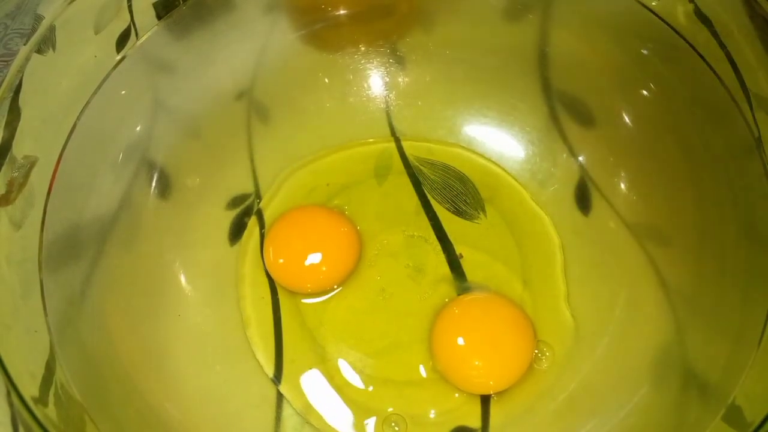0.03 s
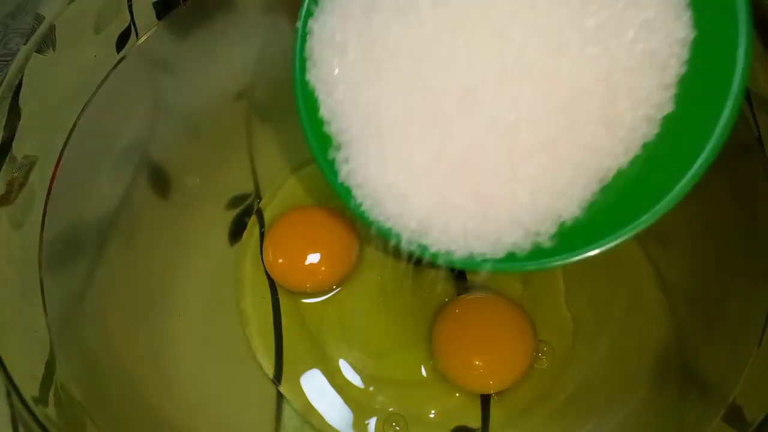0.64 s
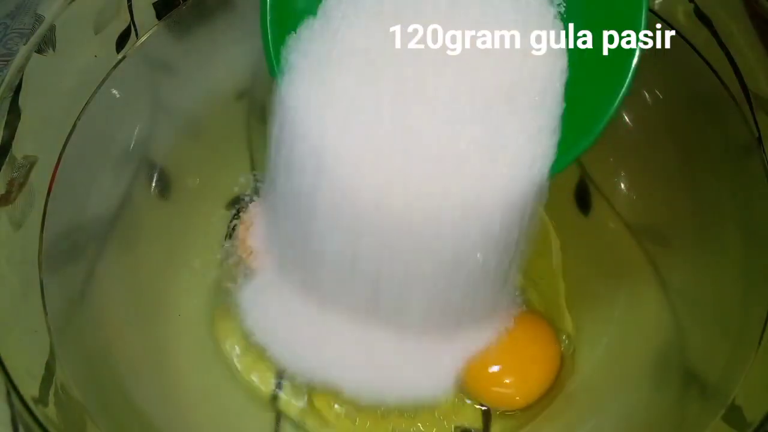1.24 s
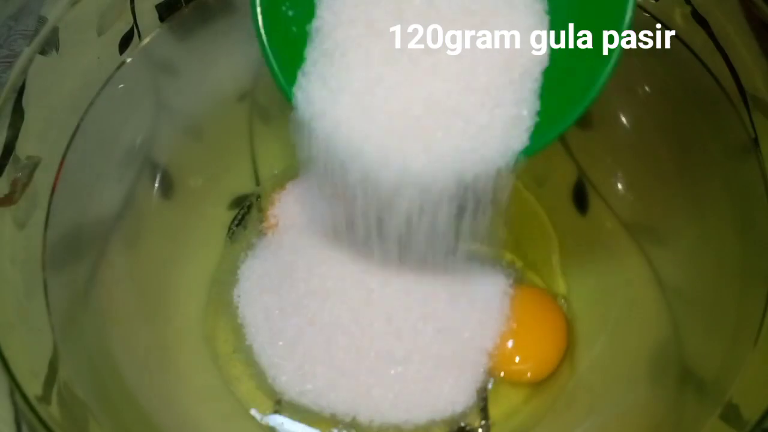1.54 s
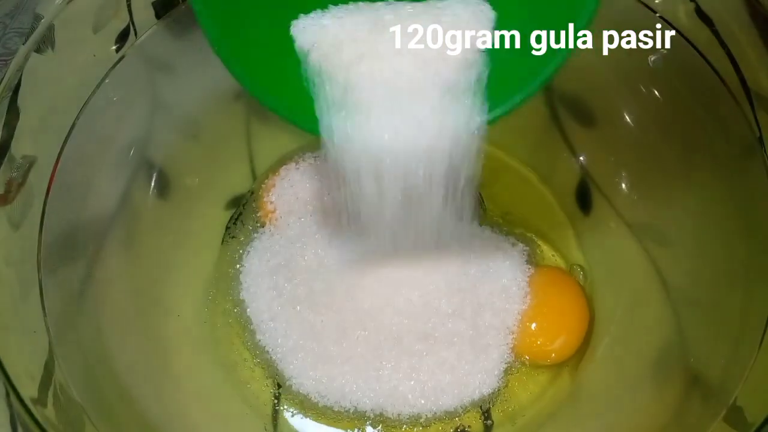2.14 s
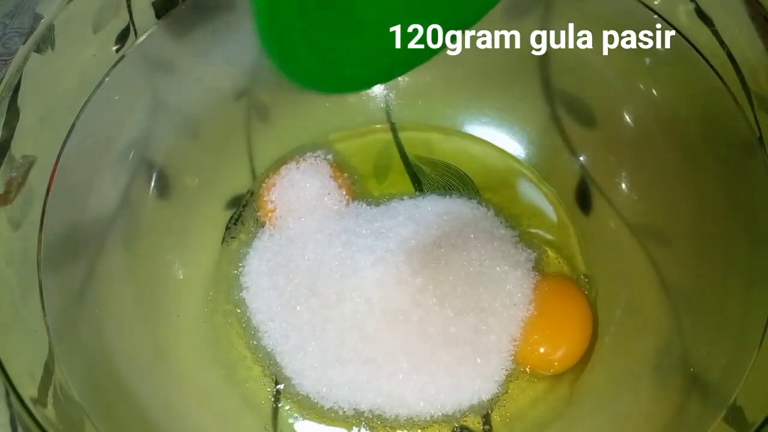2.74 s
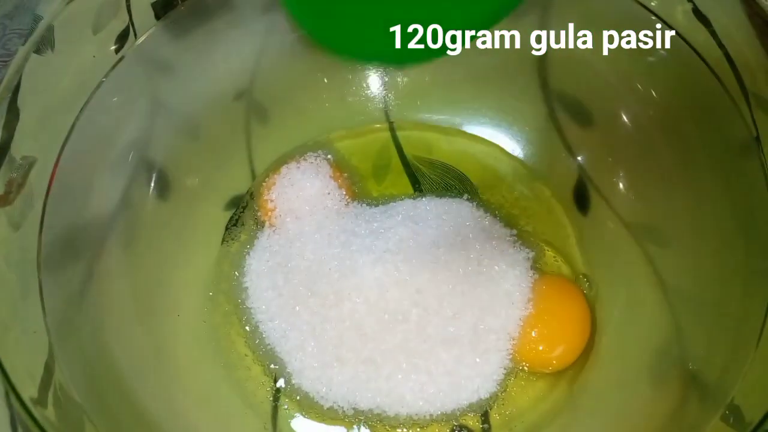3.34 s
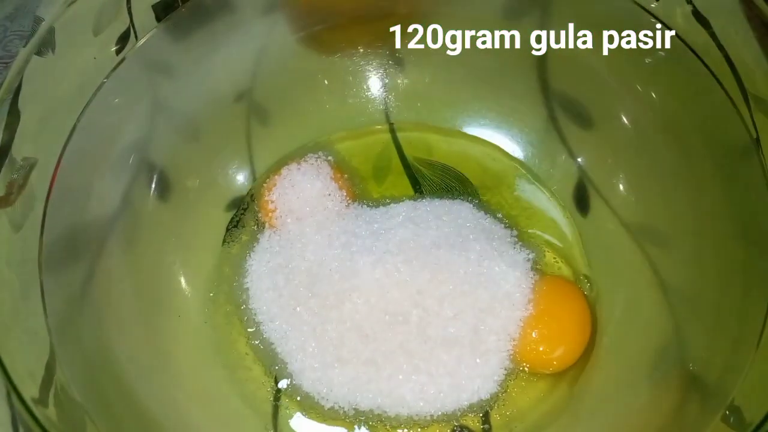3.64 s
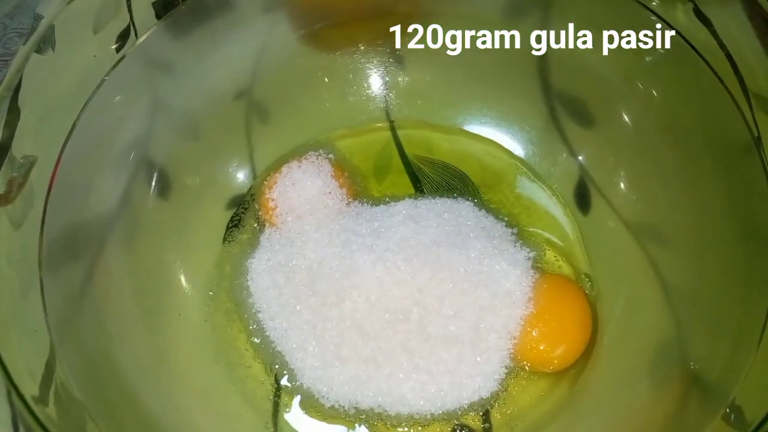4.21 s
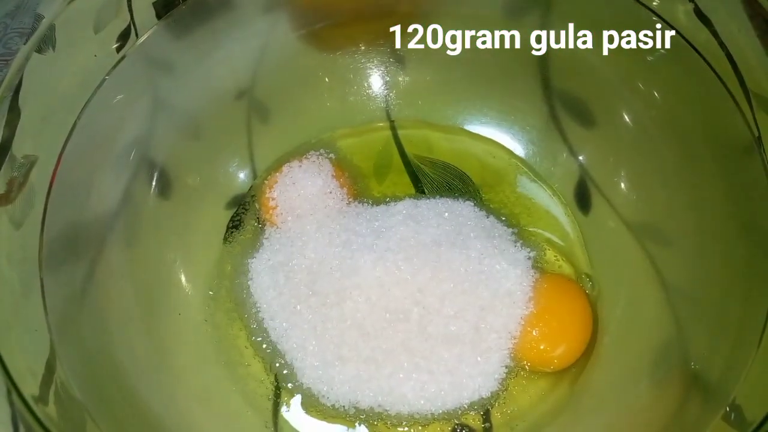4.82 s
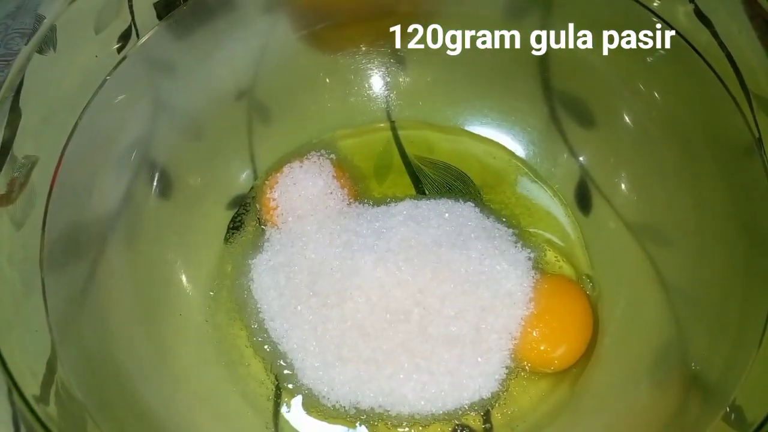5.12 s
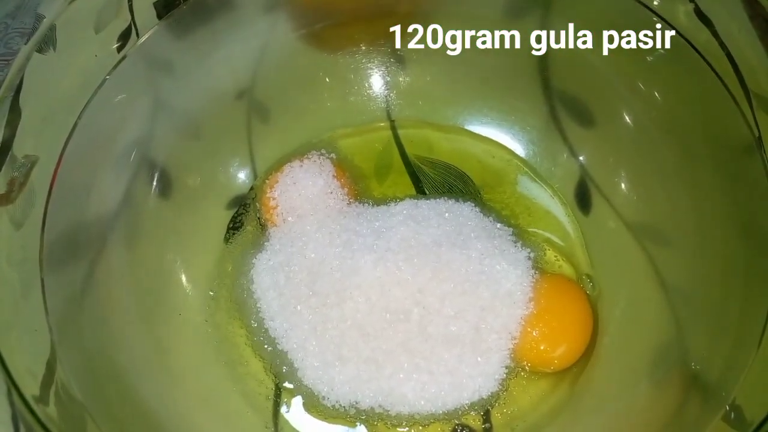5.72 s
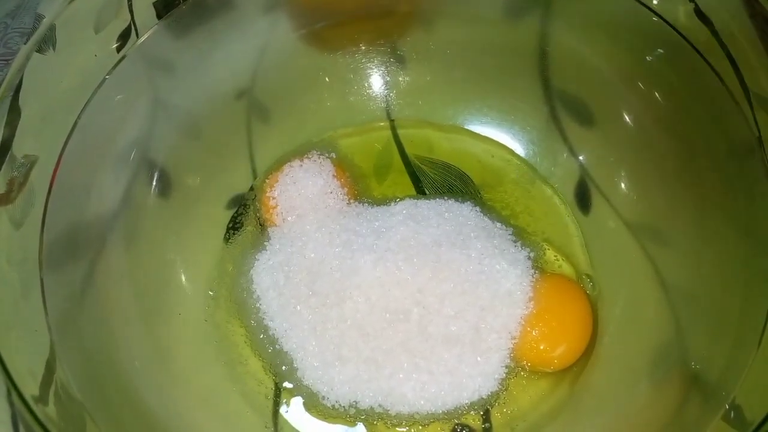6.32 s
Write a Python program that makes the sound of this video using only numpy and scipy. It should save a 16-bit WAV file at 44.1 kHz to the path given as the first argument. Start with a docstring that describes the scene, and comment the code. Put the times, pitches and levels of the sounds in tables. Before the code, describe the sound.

Close by in a small kitchen, over a faint appliance hum, sugar slides from a plastic cup and hisses gently into a glass bowl of eggs for about two seconds. Two loud, quick knocks of the cup against the rim follow, leaving a low ring in the bowl. A second later the cup lands on the worktop and rocks briefly to rest, and only the quiet room remains.

```python
"""A stream of sugar slides out of a plastic cup onto eggs in a glass mixing bowl.
Its countless small impacts merge into a hiss and a patter coloured by the resonances of the bowl.
Two knocks on the rim, to empty the cup, excite the modes of plastic and glass; the cup is then
set down on the worktop and rocks to rest. A small kitchen reverberates over an appliance's hum."""
import sys
import numpy as np
from scipy import signal
from scipy.io import wavfile

SR = 44100
rng = np.random.default_rng(int(sys.argv[2]) if len(sys.argv) > 2 else 0)


def inscribe(sig):
    """Save sig as 16-bit PCM at rate SR to the path in sys.argv[1].

    A 1-D sig is mono; a 2-D sig holds one channel per row.
    Samples are clipped to [-1, 1] before scaling.
    """
    pcm = np.round(np.clip(np.atleast_2d(sig).T, -1, 1) * 32767)
    wavfile.write(sys.argv[1], SR, pcm.astype(np.int16))


N = 280917
TIME = np.arange(N) / SR


def sugar_stream(fall_s=.02, full_flow_db=-47.5, patter_db=-50.5, flow_exponent=.88):
    """Superposed random impacts: sugar patters on wet egg and hisses on its own heap."""
    # flow of the falling stream (t/s, level/dB)
    flow_curve = [(0.8, -67), (1.06, -47.5), (1.216, -48.5), (1.306, -46), (1.436, -57.5), (1.636, -57.5),
                  (1.802, -51.5), (2.108, -56.5), (2.368, -52), (2.434, -59), (2.6, -79.5)]
    # spectra of impacts on sugar and on egg (f/Hz, level/dB)
    hiss_spectrum = [(1760, -23.5), (3000, -7.5), (3560, -9), (3820, -21.5), (4140, -3.5), (4790, -7),
                     (6660, -1), (7430, -2.5), (8070, -10), (9780, -5.5), (11600, -4), (12900, -2.5),
                     (15500, -7)]
    patter_spectrum = [(300, -7), (700, -16), (1450, -15.5), (1800, -4), (2250, -8.5), (3000, -4),
                       (3600, -5), (4700, -13), (6000, -6), (8000, -23.5)]
    # resonances of the bowl (f/Hz, width/Hz, gain/dB)
    bowl_peaks = [(1061, 166, 16), (1936, 16, 9.5), (2590, 170, 7)]
    flow = envelope(flow_curve) * wander(spread_db=.4, every_s=.02)
    arriving = np.interp(TIME - fall_s, TIME, flow) / gain_of(full_flow_db)
    covered_db = -5.5 * smooth_step(TIME, middle_s=1.62, length_s=.5)  # the heap buries the eggs
    on_egg = arriving ** flow_exponent * gain_of(patter_db + covered_db)
    hiss = shaped(grains(per_s=22000, spread_db=-1.4) * flow, hiss_spectrum)
    patter = shaped(grains(per_s=5000, spread_db=.2) * on_egg, patter_spectrum, bowl_peaks)
    return hiss + patter


def sugar_in_cup(start_s=.335, tilted_s=.5, light_s=1):
    """Stick-slip friction: crystals scrape the cup, whose resonances shift as it tilts and empties."""
    # the heap slides, then the last sugar runs out (peak t/s, level/dB, rise and fall/(dB/s))
    heap_slide = (0.61, -51.5, 44, 76)
    run_out = (2.41, -54, 49, 130)
    # clumps break loose as the cup tilts and after the first knock (t/s, level/dB)
    clumps = [(.339, -55), (.390, -61), (.405, -50), (0.427, -50), (0.472, -49), (0.512, -43),
              (0.541, -39.5), (.714, -70), (3.043, -48), (3.112, -44), (3.126, -44)]
    # spectrum of the scraping (f/Hz, level/dB)
    grit = [(500, -28.5), (2200, -11), (3300, -9), (5000, -4.5), (7300, -2.5), (8300, -4.5), (10500, -4.5),
            (13000, 1), (15500, -3)]
    # resonances of the cup at each stage (f/Hz, width/Hz, gain/dB)
    cup_full = [(3700, 130, 13), (4320, 160, 16), (5230, 200, 7), (5880, 220, 11), (11900, 300, 4)]
    cup_tilted = [(3000, 350, 7), (3650, 220, 9), (4350, 200, 5), (5220, 290, 11), (5900, 260, 10.5),
                  (11200, 250, 4), (13100, 400, 4)]
    cup_empty = [(2692, 380, 6.9), (3687, 630, 14.7), (4320, 280, 13.5), (5895, 300, 2.6), (6970, 450, 9.8)]
    slips = np.zeros(N)
    for s, db in clumps:
        add(slips, s, gain_of(db) * np.exp(-TIME[:SR // 5] / .0095))
    scrape = grains(per_s=6200, spread_db=1.5)
    tilted, heavy = TIME > tilted_s, TIME < light_s
    jerks = wander(spread_db=.5, every_s=.01)
    slide = hump(*heap_slide) * jerks * (TIME > start_s)
    sliding = scrape * (slide + slips * heavy)
    early = shaped(sliding * ~tilted, grit, cup_full) + shaped(sliding * tilted, grit, cup_tilted)
    late = shaped(scrape * hump(*run_out), grit, cup_empty)
    knocked_loose = shaped(scrape * slips * ~heavy, grit)
    return early + late + knocked_loose


def stray_crystals():
    """Brief contacts have broad spectra: lone crystals tick and skitter on bare glass."""
    # impacts (t/s, level/dB)
    crystals = [(.187, -50), (.7136, -34), (2.524, -55), (2.631, -47.5), (2.690, -39)]
    # spectrum of a tick (f/Hz, level/dB)
    tick_spectrum = [(1500, -25), (2900, 3), (4300, 1), (6500, 1.5), (8300, -4), (13000, -5), (15500, -4.5)]
    out = np.zeros(N)
    for s, db in crystals:
        add(out, s, gain_of(db) * snap(tick_spectrum, scuff=.2, fade_s=.0018))
    return out


def rim_knocks(boom_db=-30, boom_t60=.51):
    """Impact excites the modes of cup, bowl and worktop; returns the sharp hits and their bass."""
    # blows on the rim (t/s, level/dB, snap relative to that level/dB, deep note gain/dB)
    blows = [(3.0010, 0.5, -5, -4.5), (3.2244, 0.5, -2.5, -7)]
    # modes of damped cup and glass, then the bowl's lowest, beating pair (f/Hz, level/dB, T60/s)
    clack_modes = [(316.4, -34.5, 0.053), (496, -35, 0.1), (570, -22, 0.033), (784, -44, .22),
                   (1240, -42, .15), (1630, -38, .16), (2045, -29, .17), (1825, -24.5, 0.1),
                   (2083, -14, 0.024), (2416, -21.5, 0.024), (2620, -1, 0.01), (2860, -34.5, 0.11),
                   (3090, -8, 0.014), (3340, -21, 0.008), (3958, -15, 0.0029), (4530, -29, 0.0037),
                   (5960, -28, .004), (7000, -24.5, 0.002)]
    deep_modes = [(246, -37, 2), (247, -45.5, 1.8)]
    # spectra of the contact snap and of the worktop under the bowl (f/Hz, level/dB)
    snap_spectrum = [(200, -28.5), (1100, -10), (3000, 6), (5500, 2.5), (7200, -2.5), (8300, -16),
                     (10500, -15.5), (15500, -23.5)]
    boom_spectrum = [(45, -8), (85, 0), (150, 1), (200, -14.5), (260, 0.5), (340, 4), (420, -11),
                     (800, -45.5)]
    hits, note, shake = np.zeros((3, N))
    clack = ring(clack_modes, rise_s=.0005)
    deep = ring(deep_modes, rise_s=.0013, seconds=2)
    for s, db, snap_db, note_db in blows:
        add(hits, s, gain_of(db) * clack)
        add(hits, s, gain_of(db + snap_db) * snap(snap_spectrum))
        add(note, s, gain_of(note_db) * deep)
        add(shake, s, gain_of(boom_db - 60 * TIME[:SR] / boom_t60))
    boom = shaped(shake * rng.standard_normal(N), boom_spectrum)  # crowded low modes merge into noise
    return hits, note + boom


def cup_set_down(tilted_hz=956, flat_hz=721):
    """Cavity resonance: the rocking cup clops on the worktop, lower as the gap under it closes."""
    # contacts of the rocking cup, and a faint echo just after the first (t/s, level/dB, tick level/dB)
    clops = [(4.3610, -14, -25.5), (4.3780, -51, -34), (4.4952, -9.5, -16), (4.5128, -19, -16),
             (4.5183, -15.5, -20), (4.5360, -7.5, -14.5), (4.5412, -23, -18.5), (4.5565, -22, -25.5)]
    # modes of the hollow cup (ratio to its pitch, level/dB, T60/s)
    hollow_modes = [(.73, -24, 0.1), (.88, -21, 0.035), (1, -3.5, 0.025), (1.33, -16, .03)]
    # modes of the worktop (f/Hz, level/dB, T60/s)
    worktop_modes = [(102, -38, 0.23), (143, -38, 0.2), (290, -22, 0.068)]
    # spectrum of a tick (f/Hz, level/dB)
    tick_spectrum = [(300, 5), (1300, 10.5), (2400, 5), (4200, -2), (5700, -3.5), (6900, 4), (8000, -7),
                     (10000, -3.5), (13000, -8), (15500, -16)]
    out = np.zeros(N)
    thud = ring(worktop_modes, rise_s=.0038)
    for s, db, tick_db in clops:
        hz = tilted_hz + (flat_hz - tilted_hz) * smooth_step(s, middle_s=4.513, length_s=.018)
        add(out, s, gain_of(db) * (ring(hollow_modes, rise_s=.00092, pitch=hz) + thud))
        add(out, s, gain_of(tick_db) * snap(tick_spectrum, scuff=.16, fade_s=.003))
    return out


def near_echoes(x, split_hz=4200, scatter_s=.0018, direct_db=-1, scatter_db=5):
    """Scattering and reflection: the curved bowl smears the treble; near surfaces echo the rest."""
    # reflections from bowl, worktop and wall (delay t/s, level/dB)
    echoes = [(.0019, -15.5), (.0049, -18), (.0086, -8), (0.0137, -24), (.0168, -21.5)]
    body = signal.sosfiltfilt(signal.butter(3, split_hz, fs=SR, output="sos"), x)
    treble = x - body
    scatter = rng.choice([-1., 1.], SR // 40) * np.exp(-TIME[:SR // 40] / scatter_s)
    scattered = signal.oaconvolve(treble, scatter / np.linalg.norm(scatter))[:N]
    out = body + gain_of(direct_db) * treble + gain_of(scatter_db) * scattered
    for s, db in echoes:
        add(out, s, gain_of(db) * body)
    return out


def kitchen_reverb(x, build_s=.007, early_boost=1.7, early_s=.016):
    """Reverberation: dense reflections, strongest from near walls, decay at a rate set by frequency."""
    # strength of the tail (f/Hz, level/dB)
    tail_spectrum = [(60, 1.5), (200, 4.5), (400, -5), (700, 3.5), (1050, -3.5), (1900, -5.5), (2700, -13),
                     (5000, -8), (9000, -16), (15000, -5)]
    # reverberation time (f/Hz, T60/s)
    decay_times = [(80, 1), (250, 0.56), (700, 0.52), (1200, 0.52), (2500, 0.5), (6000, 0.58), (14000, .32)]
    hz, t, bands = signal.stft(rng.choice([-1., 1.], SR), SR, nperseg=512)
    t60 = at_frequency(decay_times, hz)[:, None]
    decay = gain_of(at_frequency(tail_spectrum, hz)[:, None] - 60 * t / t60)
    unit_energy = np.sqrt(2 * np.log(1000) / (t60 * SR))
    tail = signal.istft(bands * decay * unit_energy, SR, nperseg=512)[1][:SR]
    onset = 1 - np.exp(-(TIME[:SR] / build_s) ** 2)
    near_walls = 1 + early_boost * np.exp(-TIME[:SR] / early_s)
    return signal.oaconvolve(x, tail * onset * near_walls)[:N]


def appliance_hum(waver=.65):
    """Random modulation of amplitude and phase widens each tone of an appliance into a narrow band."""
    # tones (f/Hz, rms level/dB)
    tones = [(129.2, -81.5), (301.5, -79.5), (344.5, -66), (689.1, -78.5), (2945, -86), (3289, -91.5),
             (3628, -82.5), (5938, -90.5), (7214, -90), (10449, -94.5)]
    hum = np.zeros(N)
    for hz, db in tones:
        knots = np.arange(0, N / SR + 1, .1 if hz < 1000 else .02)  # high whines flutter faster
        phasors = 1 + waver * (rng.standard_normal((len(knots), 2)) @ [1, 1j])
        drift = np.interp(TIME, knots, phasors)
        hum += gain_of(db) * unit_rms((drift * np.exp(2j * np.pi * hz * TIME)).real)
    return hum


def background_noise(air_db=-59, fizz_db=-73.5, rumble_db=-65.5, drone_db=-67):
    """Incoherent noises add in power: room air, microphone fizz, rumble and a low drone."""
    # spectra of the four noises (f/Hz, relative level/dB)
    air_spectrum = [(120, -25), (200, -11.5), (265, -13.5), (294, -1), (348, -1), (369, -8.5), (432, -10),
                    (548, -11), (574, -13.5), (621, -13), (882, -10.5), (1130, -14.5), (2020, -20),
                    (2560, -30.5), (3000, -27.5), (3900, -56), (6600, -120)]
    fizz_spectrum = [(2000, -12), (3000, -5.5), (3600, 3), (4000, -5), (6400, -10), (7350, -3.5),
                     (8000, -16), (8800, -15), (10500, -8.5), (11300, -11), (11800, -19), (15500, -26)]
    rumble_spectrum = [(15, -44.5), (25, -14.5), (38, -7), (70, -8.5), (86, -5), (113, -9.5), (140, 0.5),
                       (204, -16.5), (260, -11.5), (340, -38), (570, -120)]
    drone_spectrum = [(50, -24.5), (100, -2), (135, 7.5), (175, 7), (260, 2.5), (400, -34)]
    # the drone swells at the end (peak t/s, level/dB, rise and fall/(dB/s))
    swell = (7, -52, 40, 8)
    air = gain_of(air_db) * shaped(rng.standard_normal(N), air_spectrum)
    fizz = gain_of(fizz_db) * shaped(rng.standard_normal(N), fizz_spectrum)
    rumble = gain_of(rumble_db) * shaped(rng.standard_normal(N), rumble_spectrum)
    drone = (gain_of(drone_db) + hump(*swell)) * shaped(rng.standard_normal(N), drone_spectrum)
    return air + fizz + rumble + drone


def grains(per_s, spread_db):
    """Shot noise of rms 1: crystals of uneven size strike at random times."""
    strikes = rng.random(N) < per_s / SR
    size = np.minimum(rng.exponential(1, N), 4)
    return unit_rms(strikes * rng.standard_normal(N) * gain_of(spread_db * size))


def ring(modes, rise_s, pitch=1, seconds=1):
    """Free vibration: the damped sines of a struck body, building up while the contact lasts."""
    t = TIME[:seconds * SR]
    tones = sum(gain_of(db - 60 * t / t60) * np.sin(2 * np.pi * hz * pitch * t) for hz, db, t60 in modes)
    return tones * (1 - np.exp(-(t / rise_s) ** 2))


def snap(spectrum, scuff=0, fade_s=1):
    """Response to a contact force: one impulse and an optional scuff of friction."""
    t = TIME[:SR // 20]
    force = scuff * rng.standard_normal(len(t)) * np.exp(-t / fade_s)
    force[0] = 1
    return signal.fftconvolve(force, impulse_response(spectrum))


def impulse_response(spectrum, peaks=(), size=4096):
    """Minimum-phase response of energy 1 with this spectrum and these resonances."""
    hz = abs(np.fft.fftfreq(size, 1 / SR))
    resonance_db = sum(db / (1 + (2 * (hz - f) / width) ** 2) for f, width, db in peaks)
    log_gain = np.log(gain_of(at_frequency(spectrum, hz) + resonance_db))
    response = np.fft.ifft(np.exp(np.conj(signal.hilbert(log_gain)))).real[:size // 2]
    return response / np.linalg.norm(response)


def shaped(x, spectrum, peaks=()):
    """Convolution imposes a spectrum and resonances on x."""
    return signal.oaconvolve(x, impulse_response(spectrum, peaks))[:N]


def at_frequency(points, hz):
    """Interpolation on a logarithmic frequency axis."""
    f, value = np.transpose(points)
    return np.interp(np.log(hz + 1), np.log(f + 1), value)


def envelope(points):
    """A level curve as a gain per sample, silent outside its span."""
    return gain_of(np.interp(TIME, *np.transpose(points), left=-200, right=-200))


def hump(peak_s, db, rise_db_per_s, fall_db_per_s):
    """Exponential growth to one peak, then exponential decay."""
    return gain_of(db - np.maximum(rise_db_per_s * (peak_s - TIME), fall_db_per_s * (TIME - peak_s)))


def wander(spread_db, every_s):
    """A gain for random amplitude modulation."""
    knots = np.arange(0, N / SR + 1, every_s)
    return gain_of(spread_db * np.interp(TIME, knots, rng.standard_normal(N)[:len(knots)]))


def smooth_step(t, middle_s, length_s):
    """A sigmoid transition from 0 to 1."""
    return .5 + .5 * np.tanh(2 * (t - middle_s) / length_s)


def gain_of(db):
    """Decibels to amplitude."""
    return 10 ** (np.asarray(db) / 20)


def unit_rms(x):
    """Normalisation to rms 1."""
    return x / np.sqrt(np.mean(x ** 2) + 1e-20)


def add(mix, s, sound):
    """Superposes a sound on the mix from time s."""
    part = mix[round(s * SR):][:len(sound)]
    part += sound[:len(part)]


def scene():
    """Superposition of the close sugar, knocks and cup, their reverberation and the background."""
    hits, bass = rim_knocks()
    cup = cup_set_down()
    sugar = sugar_in_cup() + sugar_stream() + stray_crystals()
    room = kitchen_reverb(hits + gain_of(.5) * cup + gain_of(-1.5) * sugar)
    return (sugar + near_echoes(hits) + bass + cup + room + background_noise() + appliance_hum())[None]


def record(dry, bass_hz=42, edge_hz=15600):
    """Band limiting: the microphone's bass roll-off and a steep treble cut."""
    thinned = signal.sosfilt(signal.butter(4, bass_hz, "high", fs=SR, output="sos"), dry)
    low_pass = signal.firwin(511, edge_hz, window=("kaiser", 9), fs=SR)
    return signal.oaconvolve(thinned, low_pass[None], "same")


dry = scene()
out = record(dry)
inscribe(out)
```